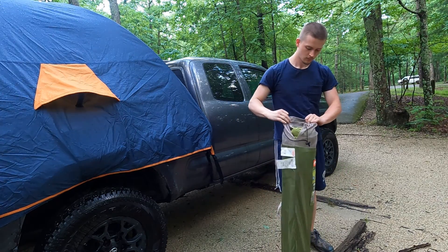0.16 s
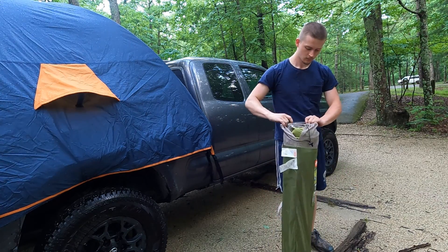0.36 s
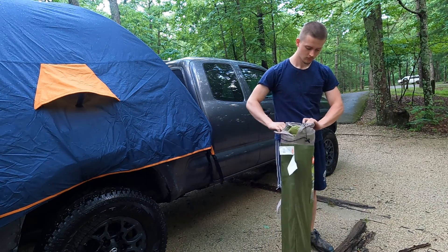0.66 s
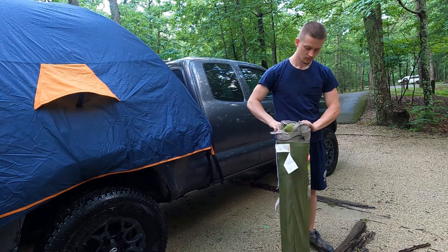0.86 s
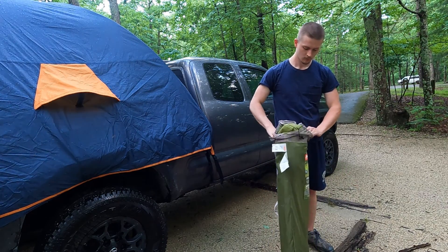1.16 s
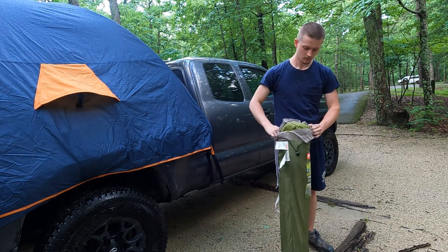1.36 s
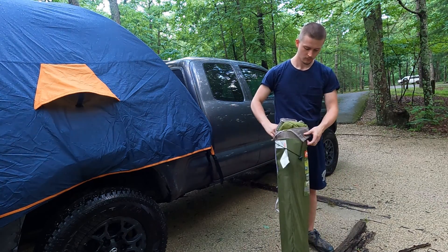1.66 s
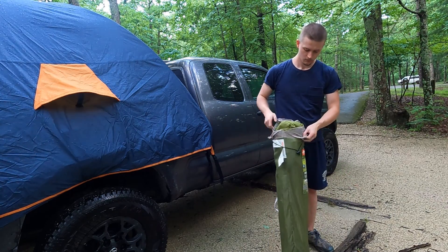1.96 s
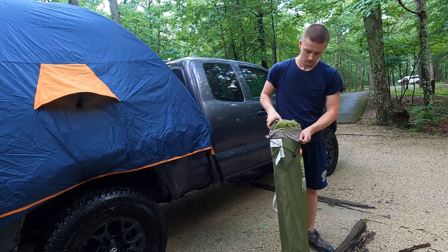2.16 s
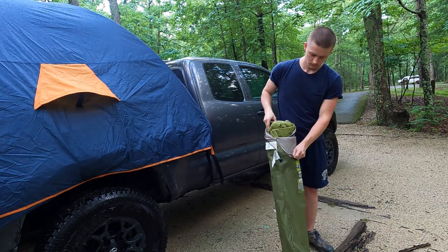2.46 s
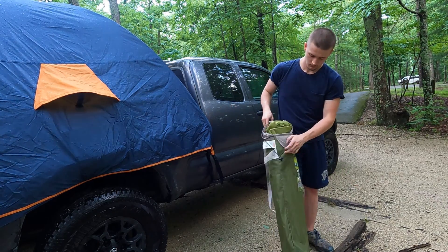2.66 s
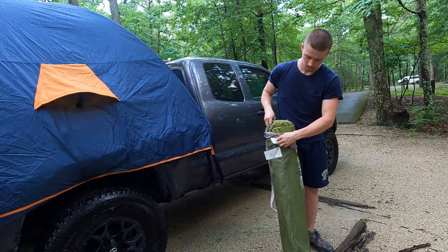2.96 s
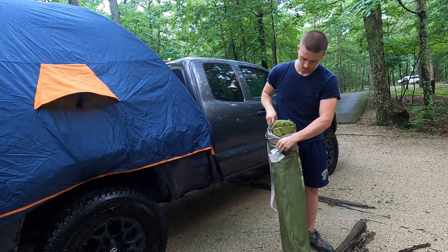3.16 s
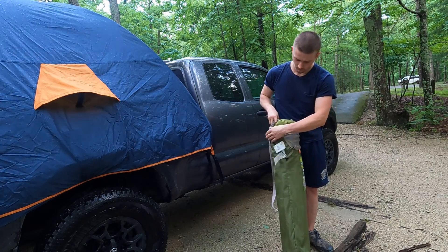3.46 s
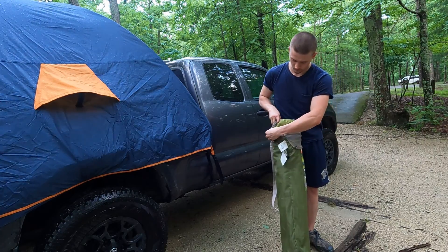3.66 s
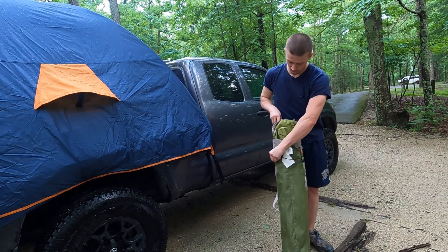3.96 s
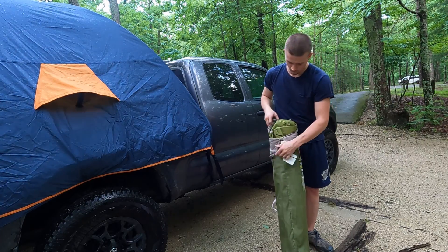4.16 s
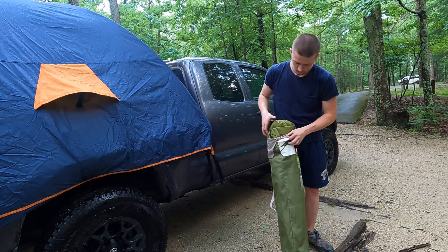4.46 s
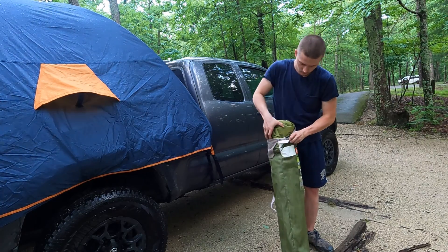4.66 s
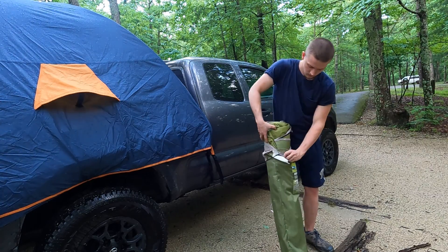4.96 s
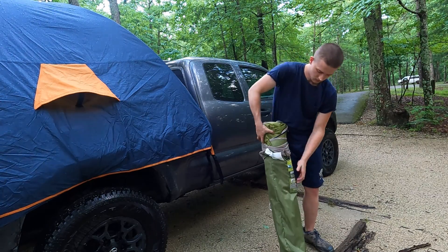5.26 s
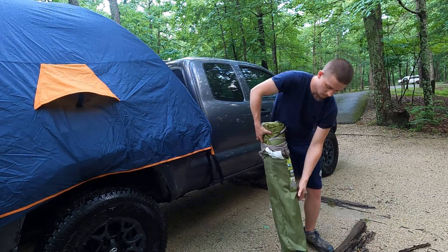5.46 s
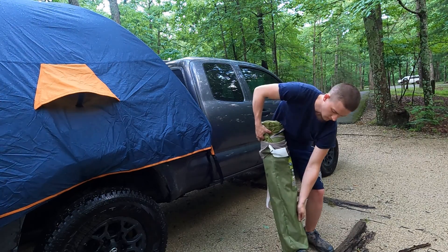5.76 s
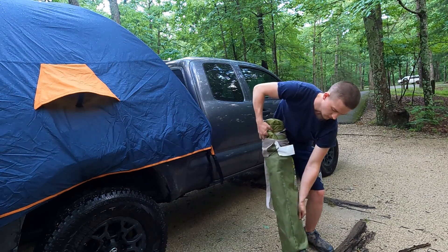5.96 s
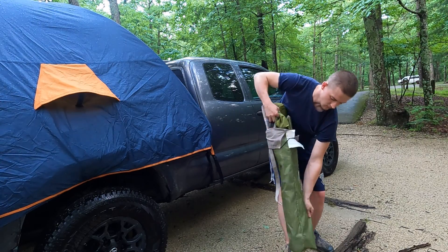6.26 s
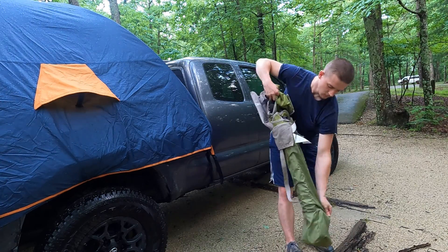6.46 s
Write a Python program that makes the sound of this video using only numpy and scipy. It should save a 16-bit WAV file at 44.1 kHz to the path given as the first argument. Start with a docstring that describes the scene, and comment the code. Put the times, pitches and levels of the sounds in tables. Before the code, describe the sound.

An outdoor stereo microphone hears a quiet forest clearing with a distant low motor drone. Somebody tugs a coated fabric sleeve in uneven strokes, with little frame taps between. The handling thickens, a small metal part rings high and thin, then sharp snaps and knocks cluster and the cloth drags in a long rough scrape at the end.

```python
"""Nylon slides and crinkles over a low motor hum and the faint hiss of the woods.
At a quiet forest campsite someone works a carrying bag down off a folded camp chair.
Hiss and slips make the cloth, pulses its snaps; noise bursts ring the frame in dull knocks.
A strap squeaks in one narrow resonance, and decaying sines make a small metal part clink."""
import sys
import numpy as np
from scipy import signal
from scipy.fft import rfft, irfft, next_fast_len
from scipy.io import wavfile

SR = 44100
rng = np.random.default_rng(int(sys.argv[2]) if len(sys.argv) > 2 else 0)


def put_to_file(sound):
    """Save the sound as 16-bit audio at rate SR, in the file named by the first command-line argument."""
    columns = np.atleast_2d(sound).T  # one column per channel
    safe = np.clip(columns, -1, 1)
    whole_steps = np.round(safe * 32767)
    wavfile.write(sys.argv[1], SR, whole_steps.astype(np.int16))


N = 291226
T = np.arange(N) / SR


def from_db(db):
    """Decibels to gain."""
    return 10 ** (np.asarray(db) / 20)


def rms_one(x):
    """Scale to unit power."""
    return x / np.sqrt(np.mean(x ** 2) + 1e-20)


def at_hz(points, hz):
    """Read a curve on a log-frequency axis."""
    f, value = np.transpose(points)
    return np.interp(np.log(hz), np.log(f), value)


def drift(rate):
    """Slow random wander, smoothed above about `rate` Hz, rms 1."""
    step = 40  # samples between the slow values
    r = np.exp(-2 * np.pi * rate * step / SR)
    noise = rng.standard_normal(N // step + 2002)
    slow = signal.lfilter([1], [1, -2 * r, r * r], noise)[2000:]  # drop the filter's start-up
    return np.interp(np.arange(N) / step, np.arange(len(slow)), rms_one(slow))


def band(x, low_hz, high_hz):
    """Band-pass."""
    sos = signal.butter(2, [low_hz, min(high_hz, .45 * SR)], "band", fs=SR, output="sos")
    return signal.sosfilt(sos, x + 1e-18)


def resonate(x, hz, width):
    """One damped resonance, `width` in Hz, with gain of about 1 on top."""
    r = np.exp(-np.pi * width / SR)
    top = np.array([1, 0, -1]) * (1 - r * r) / 2
    return signal.lfilter(top, [1, -2 * r * np.cos(2 * np.pi * hz / SR), r * r], x + 1e-18)


def grains(per_s, spread_db):
    """Tiny slips at random moments, of very unequal size; rms 1."""
    size_db = spread_db * np.minimum(rng.exponential(1, N), 4)
    sizes = from_db(size_db) * rng.choice([-1, 1], N)
    return rms_one(sizes * (rng.random(N) < per_s / SR))


def texture(spectrum, likeness, patchy_db, slips=0):
    """Stereo hiss plus slips, coloured in third-octave bands that each flicker; rms 1."""
    low, high = spectrum[0][0], spectrum[-1][0]
    edges = 16 * 2 ** (np.arange(30) / 3)
    white, out = rng.standard_normal((2, 2, N)), 0
    white[:, 0] = rms_one(white[:, 0] + slips)
    for k, (a, b) in enumerate(zip(edges, edges[1:])):
        if b > low and a < high:
            mid, side = band(white[k % 2], a, b)  # neighbouring bands use separate noise
            hz = np.sqrt(a * b)
            alike = np.clip(at_hz(likeness, hz), 0, 1)
            gain = from_db(at_hz(spectrum, hz) + patchy_db * drift(15.5))
            stereo = np.sqrt(1 + alike) * mid + np.sqrt(1 - alike) * side * [[1], [-1]]
            out = out + gain * stereo
    return rms_one(out)


# Stereo width of the surroundings. Each row: frequency in Hz, left-right correlation (0 to 1).
FAR_CORRELATION = [(50, 0.94), (110, 1), (300, 0.45), (650, 0.07), (3000, 0.3), (7000, 1), (12000, 1)]
# Motor level over time. Each row: time in seconds, rms level in dB before its slow wander.
HUM_LEVEL = [(0, -38.7), (1.5, -38), (5.3, -38.2), (6.6, -40.5)]
# Motor tones. Each row: frequency in Hz, level in dB relative to the motor level.
HUM_TONES = [(46.6, 0), (121, -26)]
# Colour of the low rumble. Each row: frequency in Hz, relative level in dB per Hz.
RUMBLE_SPECTRUM = [(20, -28), (35, 6), (55, 2), (80, -2), (125, -3), (160, -14), (220, -22), (350, -32.5)]
# Colour of the woods' hiss. Each row: frequency in Hz, relative level in dB per Hz.
WOODS_SPECTRUM = [(220, 8), (400, -4), (600, -4), (800, -9), (1150, 2.5), (1700, 0), (3000, 0), (5000, -2),
                  (7400, -7), (8600, -13.5), (12000, -23), (14000, -49)]


def background():
    """A distant motor's wavering sines hum over a soft rumble and the hiss of leaves."""
    motor = from_db(np.interp(T, *np.transpose(HUM_LEVEL)) + 0.32 * drift(1.4))
    hum = 0
    for hz, db in HUM_TONES:
        phase = 2 * np.pi * hz * T + .06 * drift(1.2)
        hum = hum + from_db(db) * np.sqrt(2) * np.sin(phase)
    rumble = from_db(-49.0) * texture(RUMBLE_SPECTRUM, FAR_CORRELATION, patchy_db=1.0)
    woods = from_db(-61.5) * texture(WOODS_SPECTRUM, FAR_CORRELATION, patchy_db=3.5)
    return motor * hum + rumble + woods


# Level lean of the chair. Each row: frequency in Hz, right over left in dB.
RIGHT_OVER_LEFT = [(100, .3), (370, 1.4), (1200, 2.3), (4200, 1.4), (8000, 0.23)]
# Phase lean of the chair. Each row: frequency in Hz, lead of the right ear in radians.
RIGHT_PHASE_LEAD = [(100, .02), (1000, 0.047), (3200, 0.59), (5800, 0.43), (7200, 0.018)]


def place(x):
    """The chair stands a little to the right; ground, truck and trees return faint dull echoes."""
    dull = band(x.mean(axis=0), 540, 3300)
    echoes = np.zeros((2, N))
    for k, delay in enumerate(rng.uniform(0.00359, .06, size=16)):  # seconds
        lag = int(delay * SR)
        echoes[k % 2, lag:] += from_db(-16 - 310 * delay) * dull[:N - lag]
    size = next_fast_len(N + SR // 10)
    hz = np.maximum(np.fft.rfftfreq(size, 1 / SR), 1)
    ear = np.array([[-.5], [.5]])  # half the difference to each side
    ears = from_db(ear * at_hz(RIGHT_OVER_LEFT, hz)) * np.exp(1j * ear * at_hz(RIGHT_PHASE_LEAD, hz))
    return irfft(rfft(x, size) * ears, size)[:, :N] + echoes


# One strap squeak. The row: centre in seconds, Gaussian half-width in seconds, level in dB, pitch in Hz.
STRAP_SQUEAK = (5.218, .008, -49, 2620)


def squeak():
    """A strap slips briefly against the frame: noise sings in one narrow resonance."""
    centre, length, db, hz = STRAP_SQUEAK
    tone = resonate(rng.standard_normal(N), hz, 160)
    tone = rms_one(resonate(tone, hz, 160))
    return from_db(db) * np.exp(-((T - centre) / length) ** 2 / 2) * tone


# Touches of the metal part. Each row: start in seconds, level in dB that scales modes and tick.
METAL_TOUCHES = [(5.3005, -22), (5.308, -42), (5.3125, -30), (5.332, -28), (5.343, -42), (5.368, -45)]
# Ringing of the metal part. Each row: mode in Hz, level in dB relative to the touch,
# time to fall 60 dB in seconds.
METAL_MODES = [(4355, -26, .16), (5173, -25, .13), (6130, -21, .07), (6712, -7, .12), (6741, -9, .16),
               (6799, -11, .23), (6856, -12, .17), (6934, -22, .15), (7170, -21, .08), (7470, -21, .08),
               (7770, -21, .08), (8010, -25, .08), (8330, -26, .12), (10020, -28, .08)]
# The mode that sings on. The row: frequency in Hz, own level in dB, time to fall 60 dB in seconds.
SINGING_MODE = (6712, -30.5, .72)


def clink():
    """Small metal bounces a few times, ringing its modes; the second touch leaves one singing on."""
    out = np.zeros((2, N))
    lead = np.array([[-1], [1]]) * .24  # radians: the ring leads at the right ear
    for k, (s, db) in enumerate(METAL_TOUCHES):
        start = int(s * SR)
        t = T[:N - start]
        modes = [(hz, db + level, t60) for hz, level, t60 in METAL_MODES]
        if k == 1:
            modes.append(SINGING_MODE)
        for hz, level, t60 in modes:
            phase = 2 * np.pi * (hz * t + rng.random()) + lead
            out[:, start:] += from_db(level - 60 * t / t60) * np.sin(phase)
        burst = rng.standard_normal(len(t)) * np.exp(-t / 0.011)
        tick = from_db(-26.0) * band(burst, 6200, 9700) + from_db(-18.0) * band(burst, 700, 10000)
        out[:, start:] += from_db(db) * tick
    return out


# Frame knocks. Each row: time in seconds, level in dB (the rms over 1/8 s lies 23.5 dB lower),
# main resonance in Hz, decay time of the cloth crush in seconds.
FRAME_KNOCKS = [(0.371, -41.5, 1040, 0.013), (0.551, -39.5, 1140, 0.011), (0.83, -34, 1630, 0.0048),
                (0.871, -23, 1150, 0.015), (1.084, -40.5, 1110, .005), (1.257, -26.5, 800, 0.012),
                (1.466, -42.5, 410, .007), (1.723, -39.5, 454, 0.011), (2.068, -36.5, 590, 0.0045),
                (2.165, -37.5, 370, 0.009), (2.245, -35, 1400, 0.0026), (2.396, -31.5, 1320, 0.0063),
                (2.648, -31.5, 1070, 0.0068), (2.989, -37, 1030, 0.011), (3.038, -30.5, 1040, 0.02),
                (4.018, -30.5, 390, .012), (4.753, -25.5, 397, 0.0082), (4.87, -25, 1040, 0.0036),
                (4.88, -25.5, 446, 0.0054), (4.963, -27.5, 437, 0.0062), (5.137, -30.5, 1040, 0.0064),
                (5.176, -30.5, 423, 0.0095), (5.257, -31, 423, 0.0045), (5.37, -32, 430, 0.0044),
                (5.572, -23.5, 1810, .004), (5.609, -24.5, 1810, 0.0076), (5.896, -30, 1160, 0.0095),
                (5.964, -26.5, 1000, 0.01), (6.047, -25.5, 1190, 0.0065), (6.181, -31, 630, 0.0057),
                (6.384, -24.5, 455, .005), (6.471, -24.5, 367, 0.0055), (6.557, -24, 1100, 0.01),
                (6.579, -23.5, 567, .005)]
# Body of the packed chair. Each row: resonance in Hz, width in Hz, gain in dB.
CHAIR_MODES = [(393.5, 113, 9), (676, 68, 8), (1040, 50, 6.5), (1330, 140, 4.5), (1400, 270, 1),
               (1810, 25, 6), (3400, 210, -9.5)]


def knocks():
    """Each knock is a click and a brief crush of cloth that rings the damped frame."""
    out, t = np.zeros(N + SR), T[:SR // 8]
    for s, db, hz, length in FRAME_KNOCKS:
        crush = rng.standard_normal(len(t)) * np.exp(-t / max(length, .001))
        crush[0] += 14  # the click
        frame = 0
        for k, (mode_hz, width, level) in enumerate(CHAIR_MODES):
            frame = frame + (-1) ** k * from_db(level) * resonate(crush, mode_hz, width)
        frame = resonate(frame, hz, 1.44 * hz)  # the place of the blow favours modes near its own pitch
        struck = resonate(crush, hz, .11 * hz)
        edge = band(crush, 4700, 4900)
        knock = rms_one(struck) + from_db(5) * rms_one(frame) + from_db(-11) * rms_one(edge)
        start = int((s + 0.00166) * SR)  # sounds 1.66 ms after the listed time
        out[start:start + len(t)] += from_db(db - 23.5) * rms_one(knock)
    return out[:N]


# Snapping creases. Each row: start in seconds, peak level in dB, centre frequency in Hz.
CREASE_SNAPS = [(0.781, -43.5, 2800), (0.872, -31, 1400), (.915, -39, 2300), (1.081, -32.5, 2170),
                (2.823, -38, 2330), (2.904, -40.5, 3020), (3.028, -30, 10000), (4.753, -28, 2020),
                (5.5737, -22.5, 2600), (5.59, -31, 3460), (5.6115, -28.5, 1850), (5.804, -26.5, 1490),
                (5.9, -29, 2190), (5.9673, -31, 1700), (6.033, -27, 1500), (6.0636, -27, 2070),
                (6.237, -33.5, 880), (6.5575, -19, 1180), (6.564, -20, 3600)]


def snaps():
    """A crease buckles in one sharp pulse, and the cloth around it shivers briefly."""
    out, t = np.zeros(N + SR), T[:SR // 20]
    for s, db, hz in CREASE_SNAPS:
        pulse = 0.05 * rng.standard_normal(len(t)) * np.exp(-t / 0.0044)
        pulse[0] = 1
        snap = resonate(pulse, hz, min(.8 * hz, 6000))
        snap = resonate(snap, hz, min(0.85 * hz, 8000))
        start = int(s * SR)
        out[start:start + len(t)] += from_db(db) * snap / np.abs(snap).max()
    return out[:N]


def stroke(start, length, db, swell_db):
    """One slide: the cloth takes up speed, swells or sags in level, and comes to rest."""
    attack_s, release_s = 0.02, 0.026
    held = np.clip((T - start) / max(length, .005), 0, 1)
    before = np.maximum(start - T, 0) / attack_s
    after = np.maximum(T - start - length, 0) / release_s
    return from_db(db + swell_db * (held - .5)) * np.exp(-np.minimum(before + after, 20))


# Slides by the hands, before the layers' own trims. Each row: start in seconds, length in seconds,
# rub level in dB, swell over the stroke in dB, low flap relative to rub in dB,
# high swish relative to rub in dB.
HAND_STROKES = [(0.0, 0.037, -55, -6.5, -2.5, -5), (0.28, 0.11, -62, 4, -5.5, -12),
                (0.814, 0.064, -57.5, 9, 1, -1.5), (1.016, 0.15, -54.5, -0.5, -2, -2.5),
                (1.2, 0.072, -49.5, 4.5, -2.5, -4.5), (1.644, 0.11, -59, 3.5, -15, -1),
                (1.85, 0.076, -62.5, -4.5, -2.5, 0), (2.075, 0.12, -59, -17.5, -6, -3.5),
                (2.294, 0.07, -53.5, 3, -5, -6), (2.395, .13, -47.5, -4.5, -5, -2),
                (2.572, 0.055, -55.5, 8, -7, -7.5), (2.649, 0.085, -55, -5, -1.5, 1),
                (2.919, 0.051, -58.5, 1, -5.5, 1.5), (3.012, 0.11, -56.5, -7.5, -3.5, 3),
                (3.192, 0.085, -50.5, 6, -7, -2), (3.351, 0.02, -52, 3.5, -4.5, -4),
                (3.663, 0.038, -57.5, -7, -12, -4), (3.99, 0.063, -47.5, 2, -3, -7),
                (4.077, 0.032, -56, -3, 6.5, -4), (4.211, .13, -56.5, 6.5, -4.5, 1),
                (4.399, 0.23, -56, 7, -3.5, 2.5), (4.813, 0.033, -49, 0, 3, 3),
                (4.875, 0.11, -46.5, -2, 2, -1), (5.134, 0.09, -51, -4, -6, -0.5),
                (5.313, 0.0088, -46.5, -16, -5.5, -6), (5.399, .025, -52, -2, -2, -5.5),
                (5.574, 0.047, -47, 2.5, 0, -7), (5.802, 0.18, -50.5, 0, -2.5, -3.5),
                (6.012, 0.082, -50, -1, -1.5, -24), (6.152, 0.075, -48.5, 1.5, -1, -4),
                (6.297, 0.094, -46.5, -1, -4.5, -2.5), (6.392, .22, -40, 6, -8, -4.5)]
# Light shuffling of the held bag. Each row: time in seconds, rub level in dB before the layer trims.
SHUFFLE_LEVEL = [(0, -68.5), (0.7, -65.5), (1.35, -60.5), (1.6, -66), (2.3, -60), (2.85, -65), (3.15, -61),
                 (3.5, -68.5), (3.85, -66.5), (4.0, -60.5), (4.7, -56), (5.35, -53.5), (5.5, -61),
                 (5.7, -53.5), (6.6, -52.5)]


def handling():
    """Strokes and light shuffling add in power; gains of rub, flap and swish."""
    shuffle = from_db(np.interp(T, *np.transpose(SHUFFLE_LEVEL)))
    power = np.outer(from_db([0, -6, -3.5]), shuffle) ** 2  # rub, flap, swish
    for start, length, db, swell_db, flap_db, swish_db in HAND_STROKES:
        slide = stroke(start, length, db, swell_db)
        power += np.outer(from_db([0, flap_db, swish_db]), slide) ** 2
    return np.sqrt(power)


# Colour of the loose bag's flap. Each row: frequency in Hz, relative level in dB per Hz.
FLAP_SPECTRUM = [(150, -10), (240, -1), (320, -5), (430, -1), (560, -6.5), (850, -7.5), (1400, -39)]
# Colour of the rubbed creases. Each row: frequency in Hz, relative level in dB per Hz.
CREASE_SPECTRUM = [(400, -14.5), (700, -6), (1150, 2.5), (1700, 1), (2500, -2), (3500, -6), (5500, -24)]
# Colour of the swishing weave. Each row: frequency in Hz, relative level in dB per Hz.
WEAVE_SPECTRUM = [(2200, -9.5), (3600, 2), (5000, 4.5), (7200, -2), (8500, -10), (11500, -8), (13500, -40)]
# Colour of the bag's rasp. Each row: frequency in Hz, relative level in dB per Hz.
RASP_SPECTRUM = [(450, -27), (620, -6), (780, 6), (1000, -7), (1400, -17)]
# Stereo width of the cloth. Each row: frequency in Hz, left-right correlation (0 to 1).
CLOTH_CORRELATION = [(200, .98), (600, .97), (1200, .96), (2200, .93), (5000, .92), (8000, .94),
                     (12000, .94)]
# Last pulls along the frame. Each row: start in seconds, length in seconds, level in dB,
# swell over the pull in dB.
RASPING_PULLS = [(6.18, 0.061, -48, -9), (6.38, 0.23, -46, 3)]


def cloth():
    """Nylon sticks and slips: creases pop, the weave swishes, the bag flaps and rasps on the frame."""
    rub, flap, swish = handling()
    grip = drift(28.6)  # the hand drags in jerks
    slips = grains(per_s=500, spread_db=3.5)

    low = texture(FLAP_SPECTRUM, CLOTH_CORRELATION, patchy_db=1.0, slips=0.93 * slips)
    body_hz, body_width, _ = CHAIR_MODES[0]
    low = rms_one(low + 0.89 * resonate(low, body_hz, body_width))  # the packed bag is a hollow body
    low = flap * from_db(-0.5 + 2.0 * grip) * low

    creases = texture(CREASE_SPECTRUM, CLOTH_CORRELATION, patchy_db=1.24, slips=0.3 * slips)
    # small wrinkles pop one by one, each ringing a few cycles at one of ten pitches
    wrinkles = 0
    for hz in np.geomspace(850, 4200, 10):
        wrinkles = wrinkles + resonate(grains(per_s=14, spread_db=3), hz, .12 * hz) / hz ** .8
    middle = from_db(-0.56) * creases + from_db(-7.5) * rms_one(wrinkles)
    middle = rub * from_db(1.97 * grip) * middle

    high = texture(WEAVE_SPECTRUM, CLOTH_CORRELATION, patchy_db=1.7, slips=0.04 * slips)
    high = swish * from_db(0.5 + 1.15 * grip) * high

    rasp = texture(RASP_SPECTRUM, CLOTH_CORRELATION, patchy_db=2.0, slips=1.4 * slips)
    rasp = sum(stroke(*pull) for pull in RASPING_PULLS) * rasp
    return low + middle + high + rasp


def scene():
    """Bag and chair in front of the forest."""
    return place(cloth() + knocks() + snaps() + squeak() + clink()) + background()


def record(dry):
    """The top is cut steeply above 14.3 kHz."""
    return signal.sosfilt(signal.ellip(10, .2, 80, 14300, fs=SR, output="sos"), dry)


dry = scene()
out = record(dry)
put_to_file(out)
```